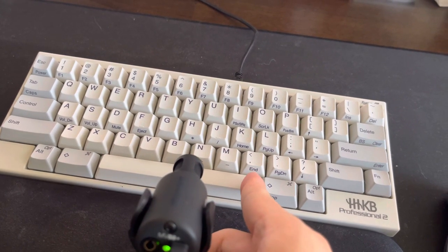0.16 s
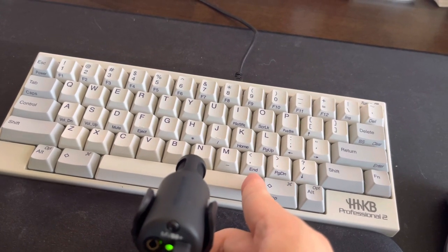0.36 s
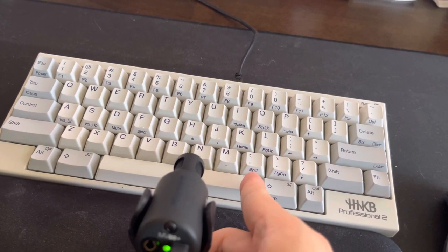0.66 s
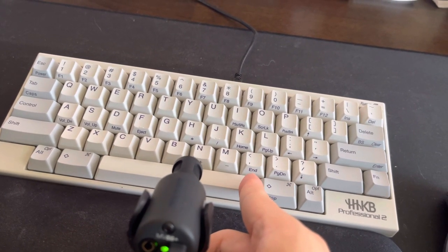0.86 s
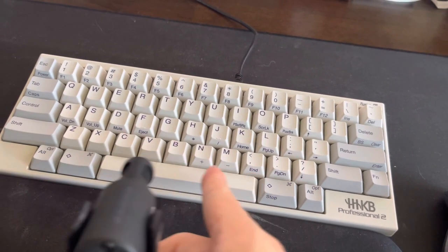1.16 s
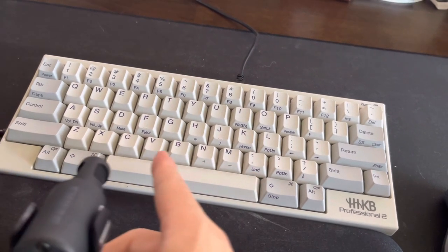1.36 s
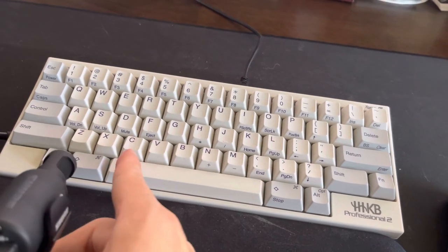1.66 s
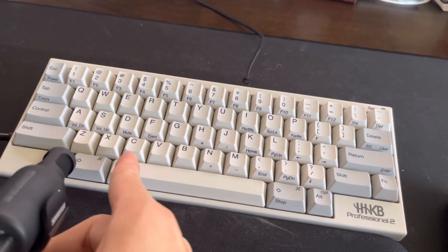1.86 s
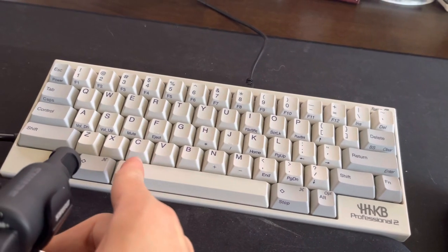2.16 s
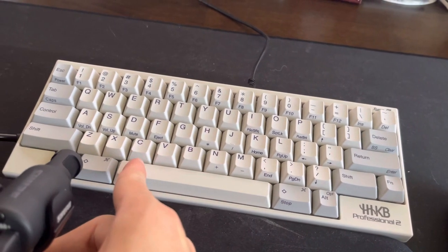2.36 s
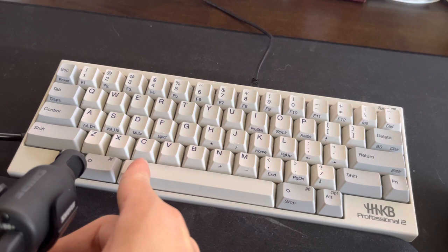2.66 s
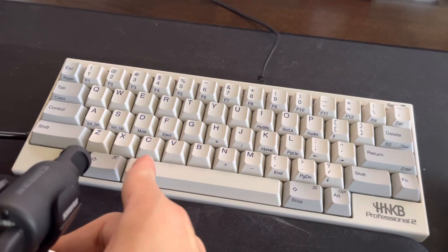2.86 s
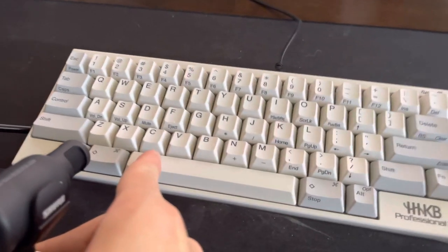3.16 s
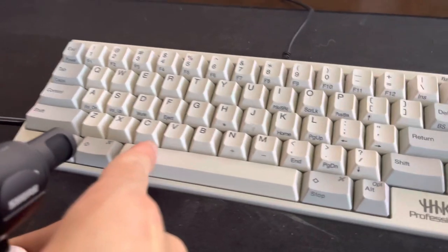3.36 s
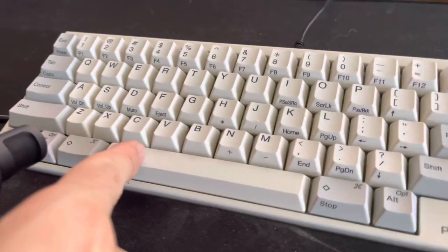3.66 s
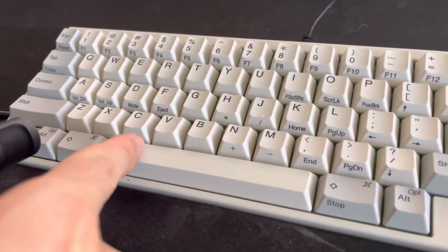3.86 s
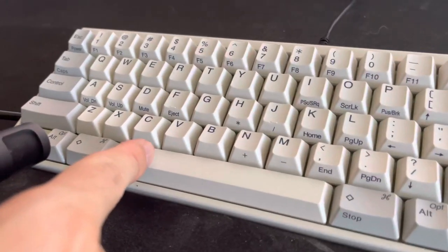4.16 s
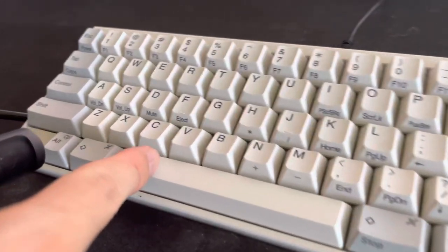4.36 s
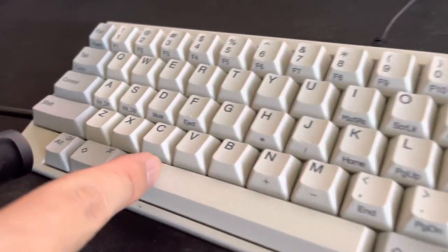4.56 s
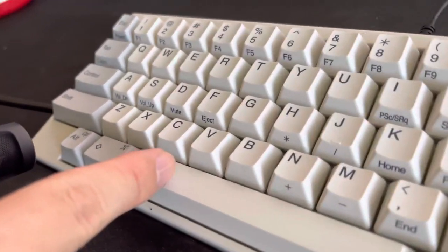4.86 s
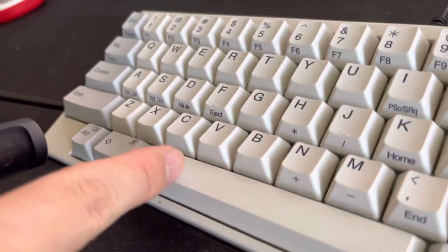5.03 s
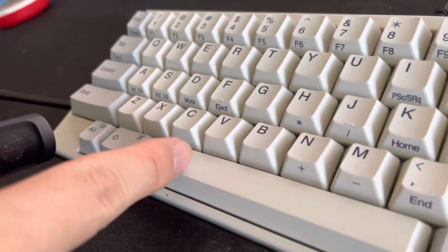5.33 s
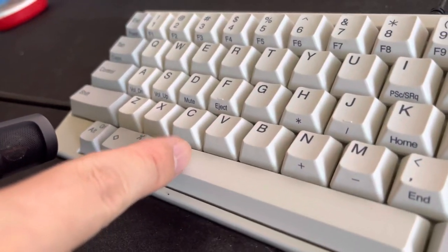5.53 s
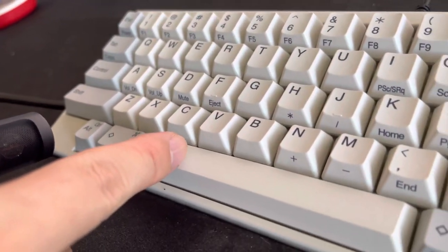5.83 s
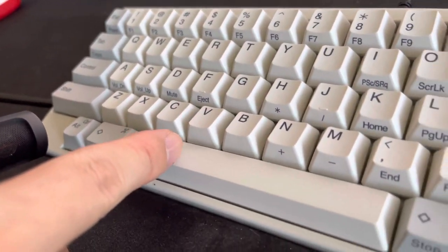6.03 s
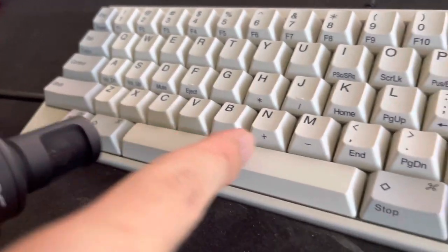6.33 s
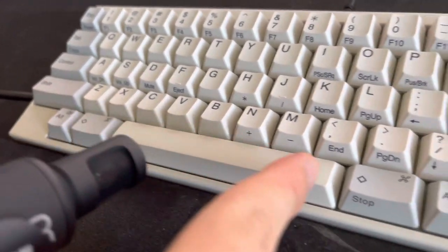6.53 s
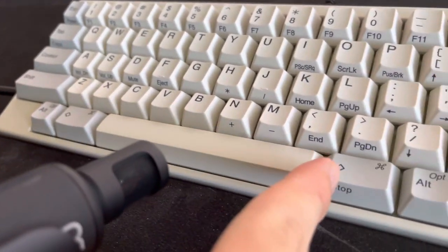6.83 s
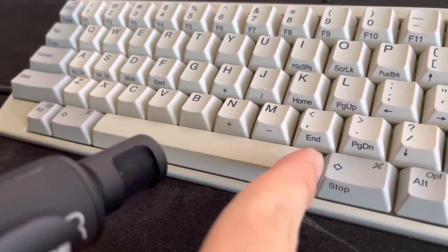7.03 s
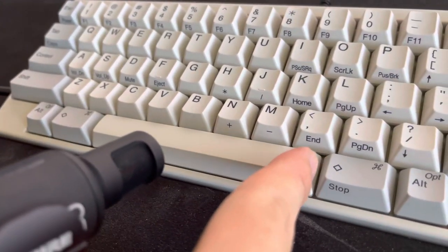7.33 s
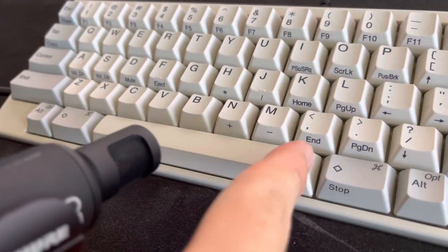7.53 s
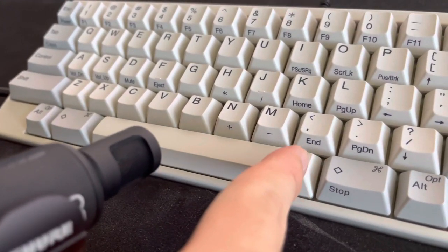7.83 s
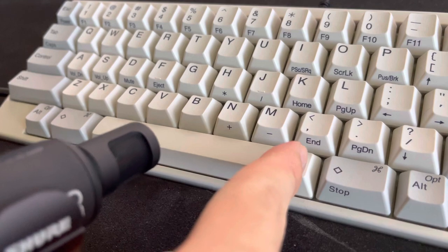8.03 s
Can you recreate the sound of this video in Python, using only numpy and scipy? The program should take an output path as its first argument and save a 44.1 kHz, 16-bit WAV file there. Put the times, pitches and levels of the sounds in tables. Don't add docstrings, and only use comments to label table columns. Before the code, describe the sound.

Sharp plastic clacks of one wide key on a desk keyboard, roughly four a second, each followed by a duller upstroke tick. Right-end presses come first, lower and more hollow; a long left-end run is louder and crisper, with thin wire ticks and far-end knocks; right-end presses finish. Skin brushes the plastic between runs. A handheld close microphone catches soft bass thumps above faint room hum and fan whine.

```python
import sys
import numpy as np
from scipy import signal
from scipy.io import wavfile

SR = 44100
rng = np.random.default_rng(int(sys.argv[2]) if len(sys.argv) > 2 else 0)


def field_ratio(decibels):
    return 10 ** (np.asarray(decibels, dtype=float) / 20)


def unload_wav(signal):
    wavfile.write(
        sys.argv[1],
        SR,
        np.round(np.clip(np.atleast_2d(signal).T, -1, 1) * 32767).astype(np.int16),
    )


N = 361179


def rms_one(x):
    return x / np.sqrt(np.mean(x ** 2) + 1e-20)


def at_hz(points, hz):
    point_hz, value = np.transpose(points)
    return np.interp(np.log(hz), np.log(point_hz), value)


def band_pass(order, low_hz, high_hz):
    return signal.butter(order, [low_hz, high_hz], "band", fs=SR, output="sos")


def ring(x, hz, t60):
    shrink = field_ratio(-60 / (t60 * SR))
    turn = 2 * np.pi * min(hz, 0.45 * SR) / SR
    return signal.lfilter([0, np.sin(turn)], [1, -2 * shrink * np.cos(turn), shrink ** 2], x + 1e-18)


def whistle(hz, width_hz):
    t60 = np.log(1000) / (np.pi * width_hz)
    once = ring(rng.standard_normal(N), hz, t60)
    return rms_one(ring(once, hz, t60))


# pitch in Hz, share of its pan.
SPREAD = [(300, 0.21), (3000, 0.77), (8000, 0.32), (14000, 0.12)]


def strike(times, level_db, pan_db, modes, rise_s, mute_s, skew=0.34, loose=1, scatter=0, harden=0):
    hz, mode_db, t60 = np.transpose(modes)[:, :, None]
    t = np.arange(int(2.5 * mute_s * SR)) / SR
    swell = 1 - np.exp(-(t / rise_s) ** 2)
    fade = swell * np.exp(-(t / mute_s) ** 4)
    gaps = skew * rng.standard_normal(hz.shape)
    starts = scatter * rng.standard_normal(hz.shape)
    octaves = np.maximum(np.log2(hz / 3500), 0)
    vary = loose * rng.standard_normal((len(times), 2, len(hz), 1))
    out = np.zeros((2, N + len(t)))
    for s, db, (strength, detune) in zip(times, level_db, vary):
        bright_db = harden * (db - np.max(level_db)) * octaves
        size = field_ratio(db + mode_db + bright_db + 1.5 * strength - 60 * t / t60) * fade
        phase = 2 * np.pi * hz * (1 + 0.008 * detune) * (t - 1.3 * rise_s) + starts
        first = int(s * SR)
        for ear, sign in enumerate([0.5, -0.5]):
            side = field_ratio(sign * pan_db * at_hz(SPREAD, hz))
            out[ear, first:first + len(t)] += np.sum(side * size * np.sin(phase + sign * gaps), axis=0)
    return out[:, :N]


def crack(times, level_db, low_hz, high_hz, fade_s):
    t = np.arange(int(7 * fade_s * SR)) / SR
    same = rng.standard_normal(len(t))
    own = rng.standard_normal((len(times), len(t)))
    out = np.zeros(N + len(t))
    for s, db, fresh in zip(times, level_db, own):
        first = int(s * SR)
        out[first:first + len(t)] += field_ratio(db) * (same + 0.79 * fresh) * np.exp(-t / fade_s)
    return signal.sosfilt(band_pass(3, low_hz, high_hz), out[:N] + 1e-18)


# pitch in Hz, level in dB per Hz.
AIR = [(19, -35), (30, 0), (60, -1), (124, -8), (194, -20), (210, -18.5), (354, -26.5), (383, -25),
       (436, -23.5), (471, -27.5), (628, -26.5), (1090, -26.5), (1240, -26), (2200, -37), (14400, -48),
       (16400, -41)]
# pitch in Hz, likeness (1 is the same).
LIKENESS = [(60, 0.98), (180, 0.91), (550, 0.8), (1650, 0.89), (4970, 1), (15000, 0.98)]


def room_air():
    rumble_db, air_db = -0.57, -55
    passing_db, passing_fade_s = 2, 1
    t = np.arange(N) / SR
    edges = 20 * 2 ** np.arange(0, 10, 1 / 3)
    white = rng.standard_normal((2, 2, N))
    out = np.zeros((2, N))
    for k, (low, high) in enumerate(zip(edges, edges[1:])):
        mid, side = signal.sosfilt(band_pass(2, low, high), white[k % 2])
        hz = np.sqrt(low * high)
        alike = np.clip(at_hz(LIKENESS, hz), -1, 1)
        gain = field_ratio(at_hz(AIR, hz) + rumble_db * (hz < 200)) * np.sqrt(hz / (high - low))
        out += gain * (np.sqrt(1 + alike) * mid + np.sqrt(1 - alike) * side * [[1], [-1]])
    return field_ratio(air_db + passing_db * np.exp(-t / passing_fade_s)) * rms_one(out)


# pitch in Hz, width in Hz, level in dB.
FAN = [
    (1247, 6, -75),
    (1276, 8, -77),
    (1375, 10, -84),
    (1260, 280, -77),
]


def fan():
    rise_s, rise_db = 1.0, -3.5
    t = np.arange(N) / SR
    whirr = sum(field_ratio(db) * whistle(hz, width_hz) for hz, width_hz, db in FAN)
    return field_ratio(rise_db * np.exp(-(t / rise_s) ** 2)) * whirr


def motor():
    off_s, fade_s = 1.35, 0.06
    t = np.arange(N) / SR
    running = 0.5 - 0.5 * np.tanh((t - off_s) / fade_s)
    low_hum = field_ratio(-59) * running * np.sin(2 * np.pi * 120.9 * t)
    return low_hum + field_ratio(-73) * whistle(188.2, 3)


# centre in seconds, peak in dB, pitch in Hz.
WOBBLE = [(0.93, -40, 58), (1.133, -43, 112), (1.57, -46, 60), (4.283, -35, 104), (5.743, -35, 79.6),
          (6.173, -52, 55), (6.325, -35.5, 99), (7.297, -41, 78.5), (7.437, -37, 109), (8.001, -35.5, 91.5)]


def wobbles():
    half_length = 0.5
    t = np.arange(N) / SR
    out = np.zeros(N)
    for s, db, hz in WOBBLE:
        swell = np.exp(-((t - s) * hz / half_length) ** 2)
        out += field_ratio(db) * swell * np.cos(2 * np.pi * hz * (t - s))
    return out


# start in seconds, peak in dB, length of a swing in milliseconds.
THUMP = [(0.048, -35.5, 7.6), (1.969, -37, 4.6), (2.392, -44, 13), (2.939, -37.5, 5.8), (3.182, -35.5, 7.2),
         (3.345, -46.5, 11.6), (3.488, -41, 10), (3.742, -38.5, 7.6), (4.907, -37.5, 10.5),
         (4.99, -42, 8.3), (5.161, -32, 8.2), (5.396, -30, 8.1), (5.474, -40.5, 7.2), (5.52, -49, 9.3),
         (5.657, -34, 6.1), (5.837, -32.5, 7.8), (5.904, -38, 7.6), (7.019, -43.5, 15), (7.129, -47, 7),
         (7.219, -41.5, 4.6), (7.364, -44, 9), (7.599, -40, 7.8), (7.733, -37, 12.5), (7.815, -42.5, 8.4),
         (7.934, -37, 10.4), (8.093, -32.5, 9.7)]


def thumps():
    rise_ms, swings = 2.3, 0.82
    out = np.zeros((2, N))
    lean_db = 1.4 * rng.standard_normal(len(THUMP))
    t_ms = np.arange(int(0.09 * SR)) / SR * 1000
    for (s, peak_db, swing_ms), lean in zip(THUMP, lean_db):
        push = np.sin(2 * np.pi * (t_ms / swing_ms) ** 0.64)
        push *= np.exp(-t_ms / swing_ms / swings) * (1 - np.exp(-t_ms / rise_ms))
        part = out[:, int(s * SR):int(s * SR) + len(t_ms)]
        part += field_ratio(peak_db + 6.0 + lean * np.array([[1], [-1]])) * push[:part.shape[1]]
    return out


# delay in seconds, level in dB.
ECHOES = [
    (.007, -34),
    (0.0128, -44.5),
    (0.0225, -33),
    (.034, -45),
]


def room(x):
    tail_db, tail_t60_s, tail_from_s, smear_s = -37.5, 0.2, 0.011, 0.0014
    t = np.arange(int(0.25 * SR)) / SR
    shape = field_ratio(tail_db - 60 * t / tail_t60_s) * (t > tail_from_s)
    for delay, level_db in ECHOES:
        shape = shape + field_ratio(level_db) * np.exp(-np.maximum(t - delay, 0) / smear_s) * (t >= delay)
    common, own = rng.standard_normal((2, len(t)))
    answer = 1.5 * shape * (common + 0.028 * own * [[1], [-1]])
    answer = signal.lfilter(*signal.butter(1, 4450, fs=SR), answer)
    answer = signal.sosfilt(band_pass(4, 1200, 8500), answer)
    return signal.fftconvolve(x, answer, axes=1)[:, :N]


# start in seconds, peak in dB.
TOUCH = [(0.332, -58), (1.846, -62), (4.408, -50), (4.477, -58), (5.162, -47), (5.396, -52), (5.837, -41)]
# pitch in Hz, level in dB, ringing time (60 dB) in seconds.
CAP = [(4200, -14, .01), (5560, -1.5, 0.0058), (6500, -17, 0.0078), (10000, -23.5, 0.0072)]
# centre in seconds, length in seconds, level in dB, pitch in Hz.
SLIDE = [(.95, .1, -83.5, 5300), (4.56, 0.059, -71.5, 4800), (5.96, 0.05, -72, 5400),
         (6.031, 0.062, -66, 5200), (6.122, 0.13, -76, 12000), (6.95, 0.059, -76, 11100),
         (7.443, 0.036, -70.5, 10900), (7.645, .03, -75, 10200), (7.812, .025, -71, 10500),
         (7.998, .03, -72, 10600), (8.173, 0.036, -77, 10500)]
# start in seconds, peak in dB.
CRACKLE = [
    (1.848, -53),
    (7.581, -61),
    (2.864, -53),
]


def finger():
    s, peak_db = np.transpose(TOUCH)
    out = strike(s, peak_db + 0.5, -0.8, CAP, 0.00028, 0.0034)
    t = np.arange(N) / SR
    for centre, length, level_db, hz in SLIDE:
        hiss = rms_one(signal.sosfilt(band_pass(2, hz / 1.25, hz * 1.12), rng.standard_normal(N)))
        out += field_ratio(level_db) * np.exp(-2 * ((t - centre) / length * 2) ** 2) * hiss
    return out + crack(*np.transpose(CRACKLE), 6000, 15800, 0.0012)


# start in seconds, peak in dB, edge in dB against the peak.
KNOCK = [(0.501, -41.5, -16), (0.771, -37, 2), (1.962, -47, -13), (2.946, -32.5, -1), (3.153, -41, -10),
         (3.18, -47, -9), (3.462, -44, -13), (3.718, -46.5, -4), (5.472, -38, -15), (5.679, -35.5, -4),
         (7.221, -48, -0.5), (7.599, -37, -10), (7.742, -43, -16), (8.102, -38.5, -13)]
# pitch in Hz, level in dB, ringing time (60 dB) in seconds.
PLATE = [(823, -11.5, 0.073), (1118, -5.5, 0.042), (1206, -10.5, 0.043), (1310, -13, 0.054),
         (1580, -15, 0.031), (2080, -10, 0.025)]
# pitch in Hz, level in dB, ringing time in seconds.
PLATE_EDGE = [(2470, -7, .012), (2970, -2.5, 0.02), (3530, -18, .012), (4000, -17, .012),
              (4800, -6, 0.0088), (5140, -22, .01), (6400, -23, 0.0077), (8200, -14, .008)]


def knocks():
    pan_db, loose = -3.5, 1.6
    s, peak_db, edge_db = np.transpose(KNOCK)
    edge_db = peak_db + edge_db
    hollow = strike(s + 0.00055, peak_db - 1.0, pan_db, PLATE, 0.00053, 0.009, loose=loose, scatter=1.2)
    grit = crack(s + 0.00054, edge_db - 2.0, 1600, 4550, 0.003)
    edge = strike(s + 0.00055, edge_db - 5.5, pan_db, PLATE_EDGE, 0.000265, 0.0062,
                  loose=loose, scatter=0.6)
    return hollow + grit + edge


# start in seconds, peak in dB.
WIRE_SNAP = [(2.864, -58), (3.107, -53), (3.151, -47), (3.154, -52), (4.905, -62), (4.999, -48.5),
             (5.626, -61), (5.848, -59)]
# pitch in Hz, level in dB, ringing time (60 dB) in seconds.
WIRE = [(2910, 9, .010), (3550, 3, 0.022), (4500, -18, .008), (7600, -7, 0.0065)]


def wire():
    slack = [(s - 0.008, db - 46) for s, db in LEFT_PRESS]
    s, peak_db = np.transpose(slack + WIRE_SNAP)
    return strike(s, peak_db + 1.0, -2.5, WIRE, 0.000427, 0.0023)


# start in seconds, peak in dB.
RETURN = [(0.0707, -45.5), (0.3227, -46.5), (0.56, -41.5), (0.8317, -41.5), (2.1296, -51), (2.4076, -51),
          (2.4138, -51.5), (2.6706, -42.5), (2.9722, -45), (3.2194, -43), (3.4896, -47), (3.7261, -49.5),
          (3.9602, -50), (4.233, -50), (4.487, -48.5), (4.7519, -50.5), (4.998, -40.5), (5.2624, -52),
          (5.4898, -46.5), (5.696, -47), (5.8979, -53), (5.9256, -51), (7.443, -45), (7.8186, -44),
          (7.9914, -47.5), (8.1552, -45.5)]
# pitch in Hz, level in dB, ringing time in seconds.
STOP = [(1240, -3, .012), (1850, -7, 0.0035), (2220, -15, 0.036), (2840, 2, 0.019), (3100, -6, 0.01),
        (3530, -36, .012), (4400, -39, 0.012), (5200, -27, 0.0066)]
# pitch in Hz, level in dB, ringing time in seconds.
RIGHT_STOP = [(1500, -3.5, 0.013), (1970, -9, 0.0073), (2350, -4, 0.011), (2740, -6, 0.01),
              (3100, -13.5, .009), (3500, -16, .009), (4100, -28, 0.0063)]


def bar_return():
    pan_db, loose = -2.5, 1.6
    s, peak_db = np.transpose(RETURN)
    boom_db = -57 + 0.35 * (peak_db - peak_db.max())
    left = (s > 1.5) & (s < 6.5)
    right = ~left
    tick = strike(s[left] + 0.00044, peak_db[left] - 3.0, pan_db, STOP, 0.000365, 0.0043)
    tick += strike(s[right] + 0.0005, peak_db[right] - 3.5, pan_db, RIGHT_STOP, 0.0004, 0.0073)
    grit = crack(s + 0.00052, peak_db - 3.5, 1520, 3600, 0.0016)
    boom = strike(s[left], boom_db[left] + 4.0, pan_db, CASE, 0.00272, 0.059, skew=0.78, loose=loose)
    boom += strike(s[right], boom_db[right] + 10.5, pan_db, RIGHT_CASE[:4], 0.0022, 0.023,
                   skew=0.8, loose=loose)
    return tick + grit + boom


def press(rows, pan_db, bar, case, lag_s, mute_s, crack_db, rattle_db, scatter):
    s, peak_db = np.transpose(rows)
    softer_db = peak_db - peak_db.max()
    boom_db = -46.5 + 0.67 * softer_db
    clack = strike(s + 0.0006, peak_db - 4.5, pan_db, bar, 0.000423, mute_s,
                   loose=1.36, scatter=scatter, harden=0.36)
    edge = crack(s + 0.0009, peak_db + crack_db + 0.63 * softer_db, 7600, 15000, 0.0019)
    rattle = crack(s + 0.0059, peak_db + rattle_db, 1500, 6400, 0.013)
    boom = strike(s + lag_s, boom_db + 3.0, pan_db, case, 0.0024, 0.038, skew=0.84)
    desk = crack(s + lag_s, boom_db + 14.0, 153, 444, 0.02)
    return clack + edge + rattle + boom + desk


# start in seconds, peak in dB.
LEFT_PRESS = [(1.9758, -23.5), (2.3181, -21), (2.587, -21), (2.8712, -19), (3.1146, -19), (3.3832, -24),
              (3.641, -24), (4.1926, -25.5), (4.4206, -21.5), (4.6833, -24.5), (4.9154, -19.5),
              (5.217, -30), (5.412, -23), (5.6385, -22), (5.858, -20)]
# pitch in Hz, level in dB, ringing time (60 dB) in seconds.
LEFT_BAR = [(872, -24, 0.016), (1295, -15.5, 0.018), (1800, -26.5, 0.069), (2270, -15, 0.017),
            (2640, -6.5, 0.016), (2830, -12, 0.022), (3064, -14.5, 0.021), (3590, -7.5, 0.023),
            (4310, -14.5, 0.018), (4760, -15, 0.0052), (5480, -6, 0.0075), (6180, -20, 0.039),
            (6640, -12, 0.012), (7450, -1.5, 0.0081), (7940, 7.5, 0.0043), (8400, -6, 0.0085),
            (9640, -19.5, 0.014), (10540, -18.5, 0.01), (11920, -14.5, 0.0053), (12600, -10.5, 0.0039),
            (13500, -22, 0.0088), (15400, -27, 0.0033)]
# pitch in Hz, level in dB, ringing time (60 dB) in seconds.
CASE = [(112, 0, 0.24), (181, 3.5, 0.069), (221.6, 1.5, 0.2), (290, -16.5, 0.078), (409.7, 3, 0.073),
        (587, -24, 0.025)]


def left_presses():
    return press(LEFT_PRESS, -5.5, LEFT_BAR, CASE, lag_s=0.0011, mute_s=0.0065,
                 crack_db=-21.5, rattle_db=-35, scatter=0.33)


# start in seconds, peak in dB.
RIGHT_PRESS = [(0.2118, -30), (0.493, -25.5), (0.7669, -24), (7.133, -31.5), (7.3713, -25.5), (7.6019, -35),
               (7.7387, -25), (7.9381, -23.5), (8.097, -24.5)]
# pitch in Hz, level in dB, ringing time (60 dB) in seconds.
RIGHT_BAR = [(890, -20, 0.02), (1287, -16.5, 0.05), (1517, -18, 0.047), (2050, -9.5, 0.019),
             (2506, 2, 0.0096), (2960, -11.5, 0.018), (3130, -9.5, .02), (3440, 1, 0.015),
             (3910, -17, 0.051), (4600, -18.5, 0.028), (5200, -13, 0.0097), (5830, -5.5, 0.01),
             (7210, -7.5, 0.011), (8520, 0, 0.004), (10050, -14.5, 0.014), (11500, -17, 0.004),
             (13700, -26, .012), (14000, -21, 0.008)]
# pitch in Hz, level in dB, ringing time in seconds.
RIGHT_CASE = [(112, -1, 0.13), (198, -3, 0.073), (274, -3.5, 0.082), (348, -10.5, 0.047), (400, 1, 0.054),
              (532, -5.5, 0.028)]


def right_presses():
    return press(RIGHT_PRESS, 0.8, RIGHT_BAR, RIGHT_CASE, lag_s=-0.0015, mute_s=0.007,
                 crack_db=-21, rattle_db=-48, scatter=0.71)


def wall_snap():
    s, peak_db = np.transpose(LEFT_PRESS + RIGHT_PRESS)
    snap = np.zeros(N)
    snap[((s + 0.001) * SR).astype(int)] = field_ratio(peak_db + 4.0)
    return snap


def scene():
    background = room_air() + fan() + motor()
    keys = finger() + knocks() + wire() + bar_return() + left_presses() + right_presses()
    echoes = room(0.1 * keys + wall_snap())
    return background + wobbles() + thumps() + echoes + keys


def band_limit(x):
    return signal.sosfilt(signal.butter(12, 16590, fs=SR, output="sos"), x)


def record(dry):
    top_cut = signal.cheby2(12, 60, 16300 * 1.03, fs=SR, output="sos")
    mix = signal.sosfilt(top_cut, dry)
    return band_limit(mix)


dry = scene()
out = record(dry)
unload_wav(out)
```